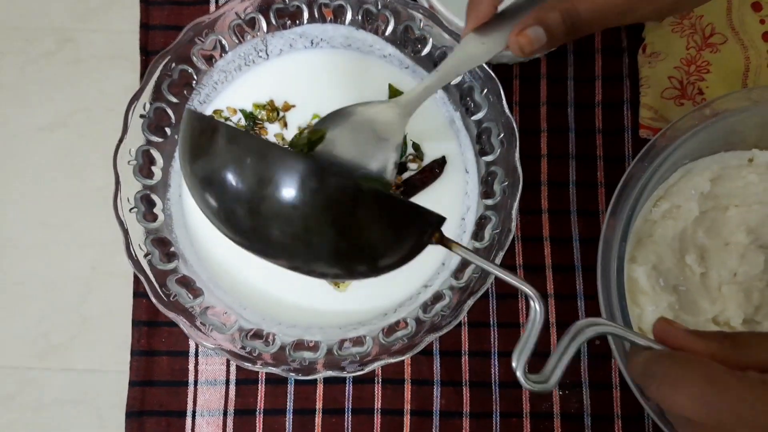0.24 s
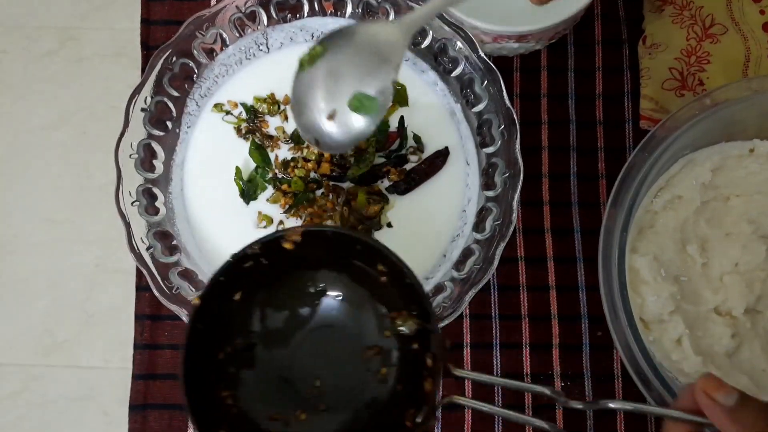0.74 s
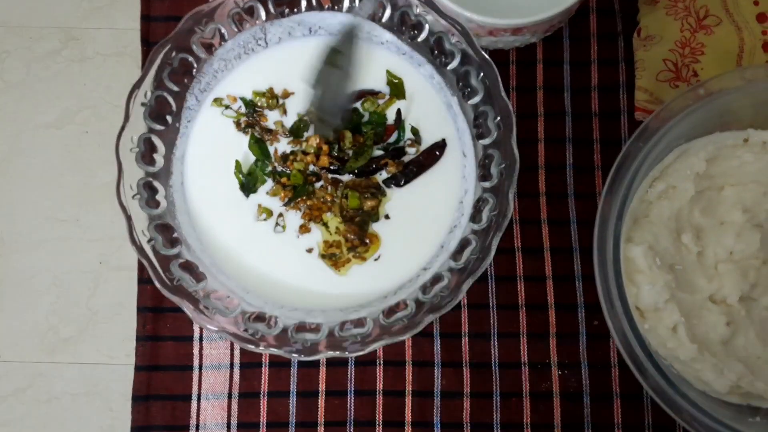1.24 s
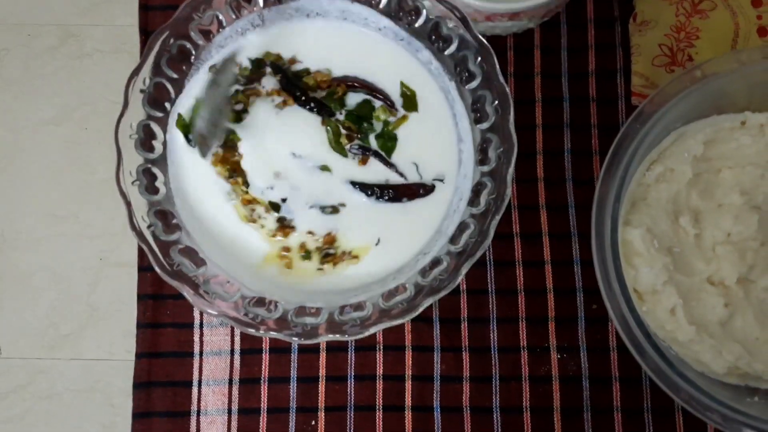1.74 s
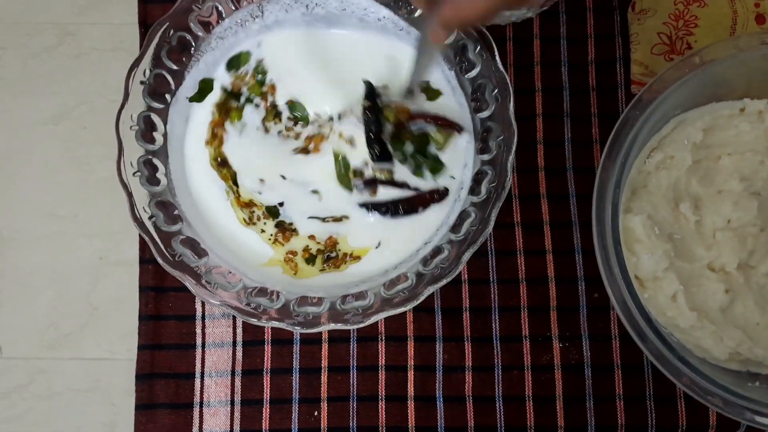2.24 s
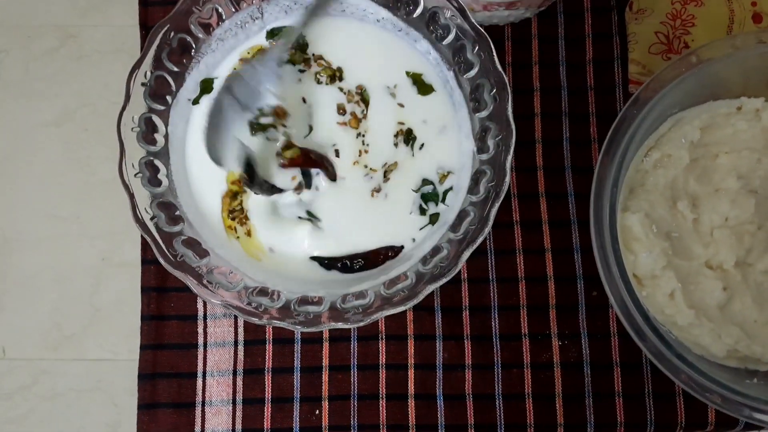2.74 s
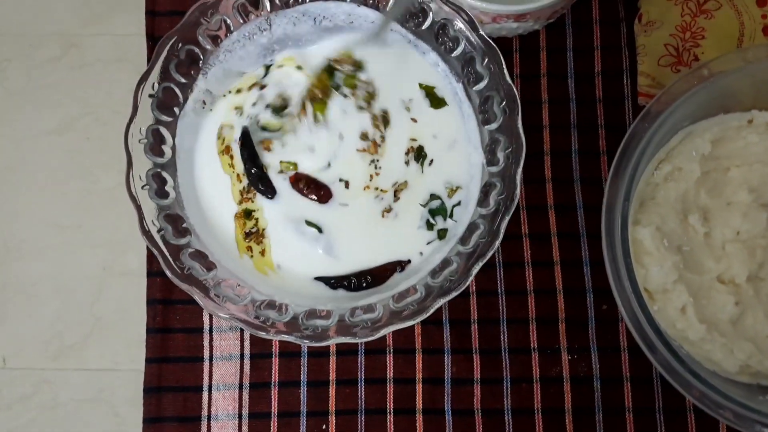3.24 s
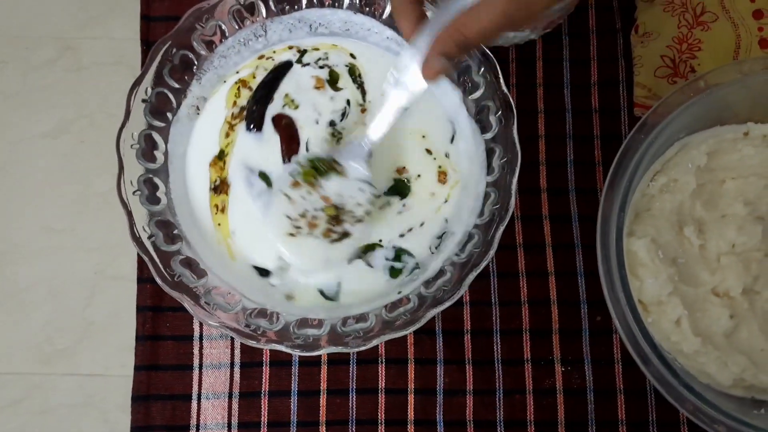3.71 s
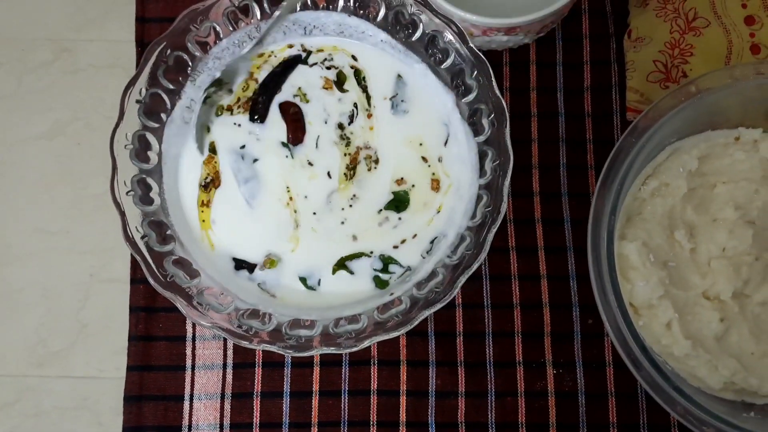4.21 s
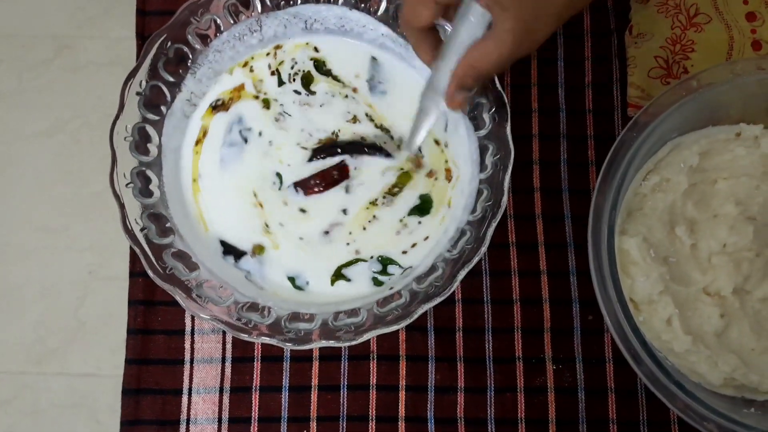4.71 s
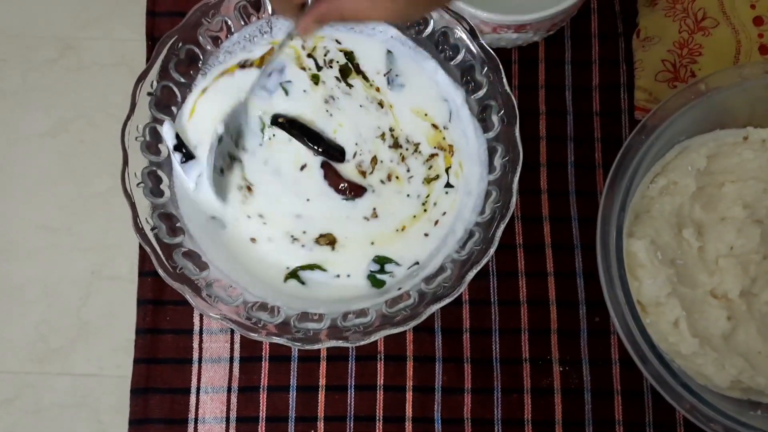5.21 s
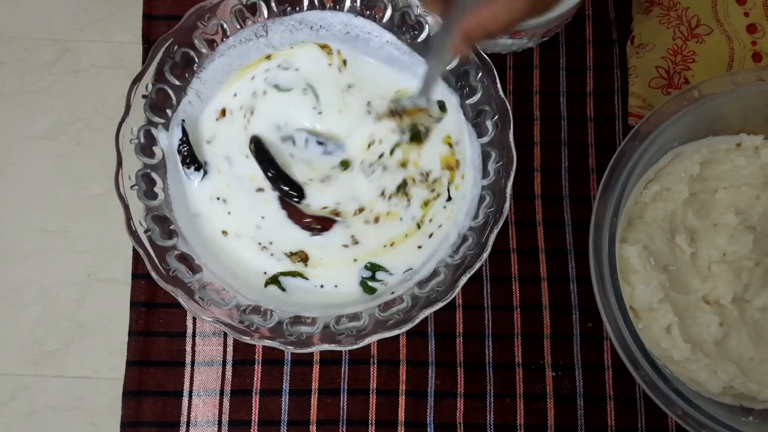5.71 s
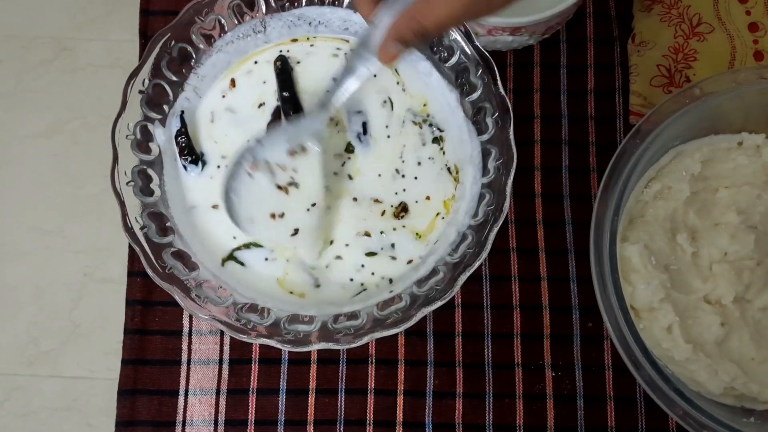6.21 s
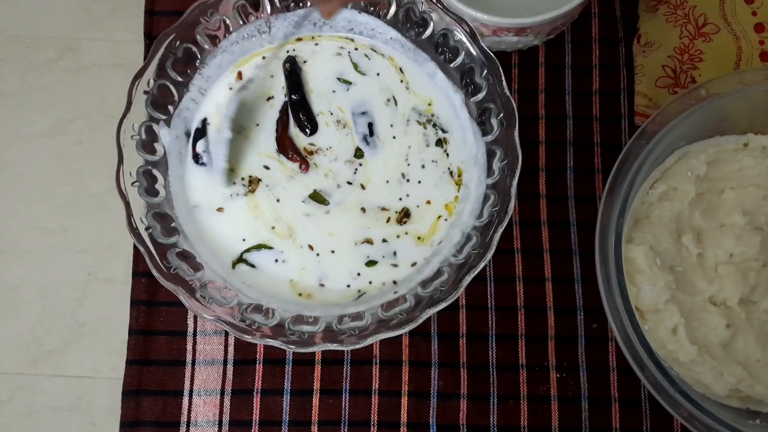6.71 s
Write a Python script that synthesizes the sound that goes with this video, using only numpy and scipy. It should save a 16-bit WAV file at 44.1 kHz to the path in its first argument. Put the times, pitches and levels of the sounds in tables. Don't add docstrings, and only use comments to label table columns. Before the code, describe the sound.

Close up in a hard-walled kitchen, a steel spoon scrapes a small iron pan in three quick rough strokes, then slips off the rim with a bright, high ring. After a near-quiet gap it stirs curd in a glass bowl: faint rubbing, sharp clacks, brief glassy notes, fine seed ticks and small wet plops. The room answers shortly over faint low rumble and microphone hiss.

```python
import sys
import numpy as np
from scipy import signal
from scipy.fft import rfft, irfft
from scipy.io import wavfile
from scipy.ndimage import uniform_filter1d

SR = 44100
rng = np.random.default_rng(int(sys.argv[2]) if len(sys.argv) > 2 else 0)


def level_to_linear(level):
    exponent = np.asarray(level, float) / 20
    return 10 ** exponent


def waveform_to_disk(signal):
    frames = np.transpose(np.atleast_2d(signal))
    scaled = np.clip(frames, -1, 1) * 32767
    samples = np.round(scaled).astype(np.int16)
    wavfile.write(sys.argv[1], SR, samples)


N = 306495


def evened(x):
    return x / np.sqrt(np.mean(x ** 2) + 1e-20)


def read(points, hz):
    f, value = np.transpose(points)
    return np.interp(np.log(hz + 1), np.log(f + 1), value)


def add(paths, s, sound, direct_db, room_db):
    start = max(round(s * SR), 0)
    for path, db in zip(paths, (direct_db, room_db)):
        part = path[:, start:start + sound.shape[-1]]
        part += level_to_linear(db) * sound[..., :part.shape[-1]]


def band(x, lo_hz, hi_hz):
    return signal.sosfilt(signal.butter(3, [lo_hz, hi_hz], "bandpass", fs=SR, output="sos"), x)


def coloured(x, gain_db):
    return irfft(rfft(x) * level_to_linear(gain_db), N)


def flutter(size, seconds):
    return evened(uniform_filter1d(rng.standard_normal(size), max(int(seconds * SR), 1)))


def ring(hz, t60, u):
    return level_to_linear(-60 * u / t60) * np.sin(2 * np.pi * hz * u)


# t/s, boost level/dB
JOLTS = [(.072, 3.5), (.097, 4.5), (0.125, 6.5), (0.203, 1.5), (.229, 0.5), (.252, -1), (0.306, 5),
         (0.3135, -7), (0.323, 2.5), (.3745, -3), (0.388, -2.5), (.407, -3), (0.494, 5.5), (0.506, 7),
         (0.5144, -0.5), (0.529, 8), (0.544, 7), (1.501, 0), (5.736, 1)]


def drag(rows, modes, edges, slips_per_s, spread_db, flutter_db, flutter_s, widen, grit_db):
    s, *columns = np.transpose(rows)
    t = np.arange(s[0], s[-1], 1 / SR)
    level_db, low_db, high_db, top_db = (np.interp(t, s, c) for c in columns)
    level_db = level_db + sum(db * np.exp(-((t - at) / 0.00269) ** 2) for at, db in JOLTS)

    slips = level_to_linear(spread_db * np.minimum(rng.exponential(1, len(t)), 3))
    slips = slips * (rng.random(len(t)) < slips_per_s / SR) * rng.choice([-1, 1], len(t))
    slips = evened(slips * level_to_linear(flutter_db * flutter(len(t), flutter_s)))
    since_start = t - s[0] + 1 - np.sign(s[0])
    fade = np.sqrt(np.clip(np.minimum(since_start, s[-1] - t) / 0.012, 0, 1))

    u = np.arange(5000) / SR
    hz, width, db = np.transpose(modes)[:, :, None]
    quarter_turn = np.pi / 2 * rng.choice([-1, 1], hz.shape) * np.array([[[0]], [[1]]])
    phase = 2 * np.pi * rng.random(hz.shape) + quarter_turn
    decay = np.exp(-np.pi * widen * width * u)
    ringing = (level_to_linear(db) * width * decay * np.sin(2 * np.pi * hz * u + phase)).sum(1)
    grit = rng.standard_normal((2, len(u))) * np.exp(-u / 0.012)

    out = 0
    for lo, hi, gain_db in zip(edges, edges[1:], [low_db, 0, high_db, top_db]):
        body = evened(band(ringing, lo, hi)) + level_to_linear(grit_db) * evened(band(grit, lo, hi))
        body = body / np.linalg.norm(body, axis=1, keepdims=True)
        drive = slips * level_to_linear(level_db + gain_db) * fade
        out = out + signal.fftconvolve(drive[None], body, axes=1)
    return s[0], out


def pressed(curve, colour_db, ignores):
    firm_db = -35
    rows = []
    for s, db, flat_db in curve:
        gains_db = np.add(colour_db, [flat_db, 0, 0]) - np.multiply(ignores, db - firm_db)
        rows.append((s, db, *gains_db))
    return rows


def favoured(modes, spots):
    out = []
    for hz, width, db in modes:
        boost_db = sum(boost * np.exp(-((hz - f) / (0.06 * f)) ** 2) for f, boost in spots)
        out.append((hz, width, db + boost_db))
    return out


# t/s, pressure level/dB, how flat the spoon lies level/dB
PAN_DRAG = [
    [(0.0, -40.5, 1.5), (0.014, -43, -5), (0.06, -44.5, 1), (0.066, -49.5, 9), (0.074, -38, -5.5),
     (0.15, -40, 2), (0.19, -33.5, 0)],
    [(0.178, -38, 0), (0.25, -31.5, -6), (0.294, -34.5, -5), (0.304, -34.5, -8.5), (0.322, -32, -10.5),
     (0.35, -55, 8)],
    [(0.352, -44.5, 0), (0.376, -31.5, -12.5), (0.402, -35, -15), (0.444, -53.5, -2), (0.47, -42, -12)],
]
# f/Hz, width/Hz, level/dB
PAN = [(829, 26, -8), (1180, 62, -1), (1710, 57, -6), (2210, 70, 2), (2900, 67, -9), (4070, 88, -13),
       (700, 40, -12), (1000, 50, -8), (1330, 60, -5), (2380, 50, -6), (2520, 60, -4), (3250, 80, -13),
       (5000, 200, -19), (6040, 110, -22), (7280, 100, -24), (8030, 56, -16), (10600, 120, -23),
       (11600, 50, -15), (12800, 110, -22), (13400, 150, -19), (14200, 48, -20), (15300, 80, -22)]
# f/Hz, boost level/dB
PAN_SPOTS = [
    [(799.5, 19), (3150, 1), (1180, 4), (1710, 6), (2210, 3.5), (2434, 16), (5000, 6.5)],
    [(790, -3.5), (1000, 3), (1180, 0.5), (1335, -3.5), (1710, -1), (2420, 5.5), (2220, 5), (3250, 9),
     (4070, 2.5)],
    [(700, -12), (1250, 6), (2210, 6), (2900, 11), (3350, 10.5), (4070, 4)],
]


def pan_scrape(paths):
    for curve, spots in zip(PAN_DRAG, PAN_SPOTS):
        rows = pressed(curve, colour_db=(0, -11, -11.5), ignores=(0, 0.47, 0.93))
        s, sound = drag(rows, favoured(PAN, spots), [500, 1600, 3500, 9500, 16000], slips_per_s=1800,
                        spread_db=2.56, flutter_db=0.64, flutter_s=0.0059, widen=1.28, grit_db=-11)
        add(paths, s, sound, 0, -10.5)


# t/s, pressure level/dB, how flat the spoon lies level/dB
SLIP = [
    (0.46, -56, 0),
    (0.492, -32, 0),
    (0.517, -24, 0),
    (0.576, -49.5, 0),
    (0.6, -55, 0),
]
# f/Hz, width/Hz, level/dB
SPOON = [(1330, 35, -16), (2350, 87, -9), (3070, 100, -7), (3350, 90, -12), (6600, 60, -14), (4110, 50, -2),
         (4240, 34, -3), (5150, 110, -16), (5540, 42, -13), (5990, 50, -4), (6990, 28, -14),
         (7210, 60, -19), (8180, 25, 3), (8340, 22, 7), (10500, 49, -18), (11100, 60, -14),
         (11300, 42, -24), (11600, 33, -16), (12300, 73, -21), (12800, 42, -11), (13300, 46, -18),
         (14300, 210, -17), (14800, 38, -25), (15400, 36, -15)]


def spoon_slip(paths):
    rows = pressed(SLIP, colour_db=(-0.69, 0, 0), ignores=(0.43, 0.021, 0.26))
    s, sound = drag(rows, SPOON, [950, 3600, 7400, 9500, 16000], slips_per_s=3000,
                    spread_db=3.1, flutter_db=0.45, flutter_s=0.0039, widen=1.4, grit_db=-12)
    add(paths, s, sound, 0, -12)


# start t/s, firmest t/s, end t/s, pressure level/dB, wetness (0-1)
STIRS = [(0.595, 0.593, 0.66, -43, 0.2), (0.674, 0.721, 1.5, -72.5, 0), (1.419, 1.43, 1.77, -51.5, 0.1),
         (1.5, 1.61, 2.05, -59.5, 0.15), (1.952, 1.966, 2.4, -61.5, 0.12),
         (2.055, 2.075, 2.22, -50.5, 0.15), (2.422, 2.514, 2.75, -52.5, 0.21),
         (2.854, 2.884, 2.924, -48, 0.13), (3.574, 3.582, 3.72, -56.5, 0), (3.936, 3.993, 4.1, -60, 0.05),
         (4.877, 4.913, 5.49, -61, 0.45), (5.028, 5.116, 5.15, -51, 1), (5.499, 5.553, 8.9, -62, 0.8),
         (5.62, 5.728, 5.83, -53, 1)]
# f/Hz, width/Hz, level/dB
GLASS = [(1420, 28, 17), (1550, 36, 16.5), (1760, 18, -2), (2160, 95, 11), (3190, 88, 2.5),
         (3800, 270, -0.5), (4290, 61, -16.5), (6700, 120, -8.5), (7700, 130, -45)]


def glass_stirs(paths):
    for start, firmest, end, db, wetness in STIRS:
        dry_db, muffled_db = np.array([(-5.5, 4.4, 6.2), (-1.7, -22, -51)])
        colour_db = dry_db + wetness * muffled_db
        rows = [(start, db - 20, *colour_db), (firmest, db, *colour_db), (end, db - 21, *colour_db)]
        s, sound = drag(rows, GLASS, [1100, 2000, 5200, 9500, 16000], slips_per_s=1500,
                        spread_db=1.84, flutter_db=5, flutter_s=0.0053, widen=1.1, grit_db=0.26)
        add(paths, s, sound, 0, -8)


# f/Hz, width/Hz, level/dB
CLACK = [(910, 74, -7), (1253, 6.2, -19.5), (1277, 3.3, -2.5), (1340, 3.5, 0.5), (1748, 8.3, -1.5),
         (1853.4, 9.6, -5.5), (2010, 7.4, -4), (2441.4, 9.3, -10), (2548, 15, -7), (2675, 54, -10.5),
         (2960, 24, -35.5), (3336, 54, -6), (4162, 290, -10.5)]


def struck_glass(drive, through_db):
    u = np.arange(3000) / SR
    hz, width, db = np.transpose(CLACK)[:, :, None]
    width = width + 12
    spot_db, detune = 2 * rng.standard_normal(hz.shape), rng.uniform(0.98, 1.02, hz.shape)
    decay = np.exp(-np.pi * width * u)
    ringing = (level_to_linear(db + spot_db) * width * decay * np.sin(2 * np.pi * hz * detune * u)).sum(0)
    ringing = ringing * 2 * np.pi / SR + level_to_linear(through_db) * (u == 0)
    return signal.fftconvolve(np.atleast_2d(drive), ringing[None], axes=1)


# t/s, thud level/dB, low clack level/dB, high clack level/dB, lowest note level/dB
KNOCKS = [
    (.492, -54, -58, -70, -80),
    (1.497, -58.5, -52, -46, -80),
    (2.056, -42.5, -35, -39.5, -47.5),
    (2.421, -45.5, -40.5, -23.5, -41),
    (3.547, -46, -35, -27.5, -41),
    (4.404, -51.5, -61, -46, -62.5),
    (4.853, -45, -45, -27.5, -45.5),
    (5.353, -50.5, -50, -38.5, -60.5),
    (5.874, -46, -36, -27.5, -39),
]


def knock(thud_db, low_db, high_db, note_db, t60):
    u = np.arange(SR // 2) / SR
    boom = band(rng.standard_normal(len(u)), 109, 344) * u * np.exp(-u / 0.035)
    boom = level_to_linear(thud_db + 8) * boom / abs(boom).max()

    chatter = rng.standard_normal(len(u)) * level_to_linear(9.4 * flutter(len(u), 0.004)) * np.exp(-u / 0.037)
    glass = struck_glass(chatter, through_db=-4)
    low, high = band(glass, 557, 1850), band(glass, 1450, 3160)
    clack = level_to_linear(low_db) * low / abs(low).max() + level_to_linear(high_db) * high / abs(high).max()

    note = ring(530.3, t60, u) - 0.68 * ring(538.77, 0.523 * t60, u)
    stilled_db = -18 * (u / (0.34 * t60)) ** 4 + 1.41 * flutter(len(u), 0.011)
    note = level_to_linear(note_db + stilled_db) * note * (1 - np.exp(-u / 0.0127))
    return boom + note, level_to_linear(8.5) * clack


def bowl_knocks(paths):
    for s, *levels_db in KNOCKS:
        t60 = 1.034 * level_to_linear(0.2 * (levels_db[-1] + 41))
        body, clack = knock(*levels_db, t60)
        add(paths, s, body, 0, -21)
        add(paths, s, clack, -7, -9.5)


def tick(sharp_db, below_db, top_db, top_share, burst_s, sharp_hz, echo_db):
    u = np.arange(700) / SR
    burst = (rng.standard_normal((2, len(u))) + 9 * (u == 0)) * np.exp(-u / burst_s)
    burst[1] = np.roll(0.54 * burst[0] + 0.89 * burst[1], 9)
    burst = burst + level_to_linear(echo_db) * np.roll(burst, round(0.00081 * SR), axis=1)
    bands_hz = [(900, 2500), (2500, 4900), (sharp_hz, 9000), (10000, 16000)]
    gains_db = [below_db, 0, sharp_db, top_db + top_share * sharp_db]
    out = 0
    for (lo, hi), db in zip(bands_hz, gains_db):
        part = band(burst, lo, hi)
        out = out + level_to_linear(db) * part / abs(part).max(1, keepdims=True)
    return out


def strike_all(paths, rows, **kind):
    for s, db, sharp_db, wet_db in rows:
        sound = level_to_linear(db + 1.5) * tick(sharp_db, **kind)
        add(paths, s, sound, 0, -np.inf)
        add(paths, s, struck_glass(sound, through_db=-8.5), wet_db - 10, wet_db + 5)


# t/s, peak level/dB at 2.5-4.9 kHz, sharpness level/dB, ring and room level/dB hard
BLOWS = [(2.0591, -22, 6.5, -7.5), (2.0714, -26, -0.5, 4.5), (2.4216, -19, -6, 2.5),
         (2.4391, -30, 0.5, -3.5), (3.5474, -22.5, -1, 3), (4.4051, -42.5, 8.5, 1), (4.4196, -40.5, -9, 9),
         (4.8514, -33.5, 4.5, -17), (4.864, -38, 2.5, 7), (5.3558, -35, -3.5, 9.5), (5.3572, -30, 1, -4),
         (5.8756, -26, -6.5, -0.5), (5.8904, -34, -3.5, 9), (5.8998, -47, -1, 0)]
DRY_SEEDS = [(1.3898, -59, 17, 11.5), (1.428, -61, 10, 0), (1.4332, -49, 18, -1), (1.4416, -44.5, 12.5, -4),
             (1.4482, -39, -4, -5), (1.4555, -46, -3, 9), (1.4595, -54, 9, -5), (1.4625, -53.5, 9, -3),
             (1.4655, -52, 9, -3), (1.496, -44, -3, -4), (1.5648, -54, 11, 15.5), (1.5735, -57, 17.5, 11),
             (1.6484, -48.5, 13, 8), (2.8374, -41.5, 7, 0), (3.982, -46.5, 4, -3), (3.9935, -47, 0, -6),
             (4.719, -56, 19.5, -11)]
WET_SEEDS = [(0.798, -54, 11, 3.5), (1.271, -54.5, 8.5, 10), (1.9667, -44, 4, -9), (1.988, -53, 11, 8),
             (2.6239, -56, -2, -11), (2.6532, -38.5, 4.5, -10), (2.7955, -42, 5, 2), (3.001, -50, 3, 7),
             (3.1921, -47.5, -1.5, 10.5), (3.5233, -51, 9, 3), (3.6909, -48.5, 4, 9.5),
             (3.7628, -42, 2.5, -0.5), (3.8145, -49.5, 0, 3), (4.7264, -52, -1.5, 8), (2.4495, -31, -5, -7),
             (2.669, -56.5, -3, -4), (5.5567, -54, -3, -1), (5.5811, -52, 3, -7), (5.6959, -57, 10.5, 13),
             (5.6215, -42.5, -1, -15), (6.6453, -59, 17, -10), (6.774, -61, 10, -2)]
EDGE_TAPS = [
    (2.554, -25, -22.5, -20),
    (2.844, -29, -2.5, -6),
    (2.8825, -25.5, -1.5, -2.5),
    (2.8924, -47.5, -13, -7),
]
SNAPS = [(1.6565, -43, -4.5, -8.5), (1.7475, -53, -3, -7), (1.776, -59, 7, -7), (5.6587, -38, 0, -11),
         (5.6617, -36, -14, -11), (5.7335, -45.5, -8, 9.5), (5.779, -46, -6.5, -5), (5.811, -43.5, -8, -8)]
GRIT = [(2.128, -44, 11, -8), (2.2128, -58, 9, -5), (2.5275, -50, -3, -5), (2.569, -57, 8, -5),
        (2.5949, -52, 7, -5), (3.4509, -60, 13, -5), (3.4639, -58.5, 12.5, -2.5), (3.472, -55.5, 9.5, -5),
        (3.5806, -43, 12.5, -9.5), (3.7982, -56, 1.5, -5), (3.9239, -57, 10, -5), (4.0231, -54, -1, -5),
        (4.6587, -62, 4, -5), (5.342, -52, -4, -5), (6.127, -60, 0.5, 4), (6.4222, -71, 4, -5),
        (6.6217, -67, 2, -5), (6.7021, -65.5, 6, -5), (6.7295, -67, 6, -5)]


def sharp_contacts(paths):
    strike_all(paths, BLOWS, below_db=-4.5, top_db=-15, top_share=0.38,
               burst_s=0.00088, sharp_hz=5950, echo_db=-3.4)
    strike_all(paths, DRY_SEEDS, below_db=-5, top_db=-0.5, top_share=-0.1,
               burst_s=0.00101, sharp_hz=6340, echo_db=-27)
    strike_all(paths, WET_SEEDS, below_db=-10, top_db=-33, top_share=0.079,
               burst_s=0.0017, sharp_hz=5950, echo_db=-17.5)
    strike_all(paths, EDGE_TAPS, below_db=-30, top_db=1.8, top_share=0.97,
               burst_s=0.0014, sharp_hz=5200, echo_db=-27.5)
    strike_all(paths, SNAPS, below_db=-18.5, top_db=-24, top_share=0.3,
               burst_s=0.00021, sharp_hz=5500, echo_db=-26.5)
    strike_all(paths, GRIT, below_db=-18, top_db=-18.5, top_share=0.28,
               burst_s=0.0007, sharp_hz=5500, echo_db=-18)


def plop(db, hz, t60):
    u = np.arange(12000) / SR
    unsteady_db = 3 * flutter(len(u), 0.006) * np.minimum(u / 0.02, 1)
    return level_to_linear(db + unsteady_db) * ring(hz * (1 + 0.1065 * u), t60, u) * (1 - np.exp(-u / 0.00027))


# t/s, peak level/dB, f/Hz, t60/s
PLOPS = [(1.4966, -32.5, 1420, 0.016), (1.4961, -45.5, 1986, .015), (1.51, -47, 1474, 0.152),
         (1.564, -45.5, 1647, 0.033), (2.064, -44, 1290, 0.3), (2.125, -44, 1800, 0.15),
         (2.422, -30.5, 1940, 0.097), (2.423, -38, 1200, 0.114), (2.44, -40.5, 1602, 0.176),
         (2.439, -38, 3250, .05), (2.45, -39, 3250, 0.042), (4.853, -41.5, 3090, 0.076),
         (4.87, -44.5, 2680, 0.092), (3.473, -51, 1065, 0.12), (3.55, -36.5, 1247, 0.225),
         (3.548, -41.5, 2397, 0.43), (3.581, -31.5, 3196, 0.024), (3.591, -36.5, 1314, 0.146),
         (3.713, -48.5, 1300, .045), (2.8775, -47, 7990, 0.011), (3.966, -36.5, 3600, 0.0113),
         (5.11, -60, 1550, 0.205), (5.358, -50.5, 1390, 0.41), (5.358, -45, 2354, 0.284),
         (5.6208, -36, 3830, 0.02), (5.623, -40.5, 6840, .01), (5.733, -44.5, 3173, 0.03),
         (5.556, -60, 1710, .15), (5.69, -61, 1760, 0.44), (5.882, -45.5, 1298, 0.3),
         (6.02, -56.5, 1313, 0.13), (6.062, -45.5, 931, 0.067)]
# t/s, peak level/dB, f/Hz, t60/s
PINGS = [(.252, -30, 2160, .05), (.304, -36.5, 2220, .04), (.3125, -30.5, 2220, 0.031),
         (.3215, -27, 2220, 0.029), (.3735, -29.5, 2210, 0.044), (.386, -34.5, 2160, 0.061),
         (.386, -34, 2918, 0.046), (.405, -41.5, 2180, 0.038), (0.468, -45, 8180, 0.092),
         (.486, -36, 8220, 0.099), (0.5036, -30, 8500, .05), (0.507, -28, 8200, .04),
         (0.5155, -22, 8410, 0.056), (0.528, -28, 8314, 0.041), (.544, -31.5, 8360, 0.032),
         (.541, -30.5, 6055, 0.069)]


def lone_notes(paths):
    for s, *row in PLOPS + PINGS:
        add(paths, s, plop(*row), 0, -8)


# f/Hz, t60/s
KITCHEN = [(100, 0.07), (300, 1), (1000, 0.328), (3000, 0.49), (8000, 0.38), (16000, 0.34)]
# f/Hz, rise time t/s
BUILD_UP = [(100, 0.006), (500, 0.0069), (1500, 0.0031), (5000, 0.0024)]
# f/Hz, level/dB
WALLS = [(1000, 2.5), (2000, 2.5), (3300, -5), (4500, -2.5), (6000, -0.5), (8000, -5), (12000, 5.5)]


def room(x):
    x = coloured(x, read(WALLS, np.fft.rfftfreq(N, 1 / SR)))
    hz, t, z = signal.stft(rng.standard_normal((2, SR)), SR, nperseg=256, noverlap=224)
    same = 1 / (1 + (hz[:, None] / 900) ** 2)
    z[1] = same * z[0] + np.sqrt(1 - same ** 2) * z[1]
    decay = level_to_linear(-60 * t / read(KITCHEN, hz)[:, None])
    growth = 1 - np.exp(-t / read(BUILD_UP, hz)[:, None])
    tail = signal.istft(z * decay * growth, SR, nperseg=256, noverlap=224)[1]
    return signal.fftconvolve(x, tail / np.linalg.norm(tail[0]), axes=1)[:, :N]


def causal(x, gain_db):
    log_gain = np.log(level_to_linear(gain_db))
    circle = np.concatenate([log_gain, log_gain[..., :0:-1]], axis=-1)
    phase = -signal.hilbert(circle).imag[..., :log_gain.shape[-1]]
    return irfft(rfft(x) * np.exp(log_gain + 1j * phase), N)


# f/Hz, level/dB
PORT = [(6900, 1.5), (8100, 10), (8800, -6), (9250, -0.5), (9550, -17), (9900, -2), (11000, -2.5),
        (15350, -4.5), (15600, -37.5)]
# f/Hz, level/dB
NEAR_BALANCE = [(100, 3), (700, 2), (2000, 5), (4000, 7), (8000, 10), (9200, 4), (10500, -8), (16000, -8)]


def through_ports(x):
    hz = np.fft.rfftfreq(N, 1 / SR)
    return causal(x, read(PORT, hz) + read(NEAR_BALANCE, hz) * np.array([[0.5], [-0.5]]))


# f/Hz, level/dB per Hz
RUMBLE = [(15, -65), (25, -65), (44, -13.5), (167, -10.5), (199, -9.5), (366, -7.5), (446, -8.5),
          (470, -10.5), (790, -23), (864, -32), (962, -25.5), (1800, -33), (2340, -73), (3960, -120)]
# f/Hz, level/dB per Hz
HISS = [(1060, -22.5), (1800, -21.5), (2300, 1), (2650, -13), (2910, -25), (4020, -23.5), (4480, -32.5),
        (5770, -19.5), (6210, -14.5), (7300, -14.5), (8070, -3.5), (8910, -19.5), (9320, -56), (10900, -29),
        (15600, -38)]
# f/Hz, level/dB
HISS_EDGES = [(9800, 0), (9950, -20), (10300, -20), (10450, 0), (15350, 0), (15500, -30)]
# f/Hz, level/dB, waver f/Hz
FAN = [(150.3, -74.5, 9.2), (201.8, -66, 5.1), (235, -73.5, 12), (444, -68.5, 3.7), (2561, -77, 3)]
# f/Hz, coherence (-1 to 1)
SAME = [(60, -0.032), (130, 0.55), (290, 0.6), (640, 0.45), (1410, -0.17), (3100, -0.33), (6820, 0.018),
        (15000, -0.056)]
# f/Hz, level/dB
FAR_BALANCE = [(60, 10.5), (120, 5), (240, 4), (480, -0.5), (950, 4.5), (1890, -2), (3770, -4), (7520, 4.5),
               (15000, -10)]


def background():
    hz = np.fft.rfftfreq(N, 1 / SR)
    left, other = rfft(rng.standard_normal((2, N)))
    same = np.clip(read(SAME, hz), -1, 1)
    pair = irfft([left, same * left + np.sqrt(1 - same ** 2) * other], N)
    rumble = evened(coloured(pair, read(RUMBLE, hz))) * level_to_linear(1.6 * flutter(N, 0.62))
    hiss = evened(coloured(pair, read(HISS, hz) + read(HISS_EDGES, hz))) * level_to_linear(0.14 * flutter(N, 0.18))
    out = level_to_linear(-63.5) * rumble + level_to_linear(-58) * hiss
    t = np.arange(N) / SR
    for f, db, waver_hz in FAN:
        swing = flutter(N, 0.5 / waver_hz) + 1j * flutter(N, 0.5 / waver_hz)
        out += level_to_linear(db) * (swing * np.exp(2j * np.pi * f * t)).real
    return coloured(out, read(FAR_BALANCE, hz) * np.array([[0.5], [-0.5]]))


def scene():
    paths = np.zeros((2, 2, N))
    pan_scrape(paths)
    spoon_slip(paths)
    glass_stirs(paths)
    bowl_knocks(paths)
    sharp_contacts(paths)
    lone_notes(paths)
    direct, to_room = paths
    return through_ports(direct + room(to_room)) + background()


def low_pass(x):
    return signal.sosfilt(signal.butter(12, 16220, fs=SR, output="sos"), x)


def record(dry):
    return low_pass(dry)


dry = scene()
out = record(dry)
waveform_to_disk(out)
```